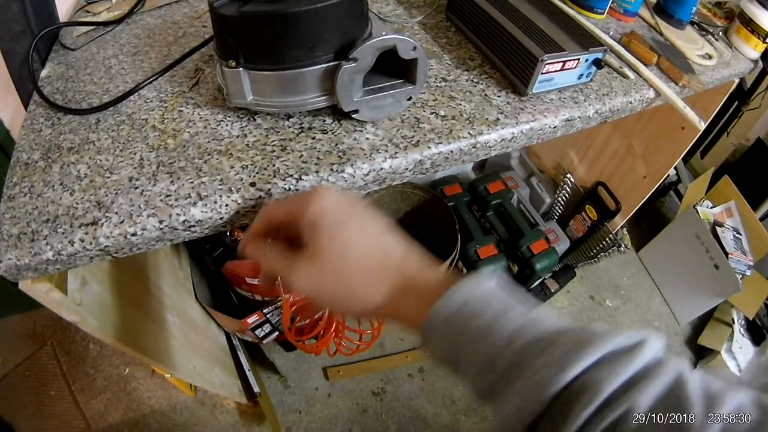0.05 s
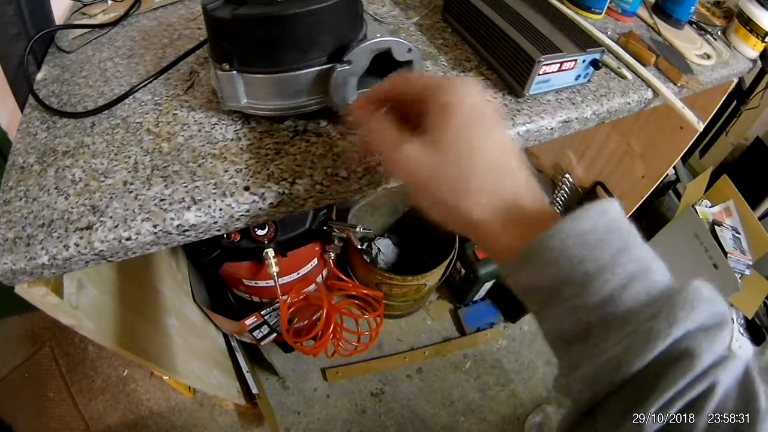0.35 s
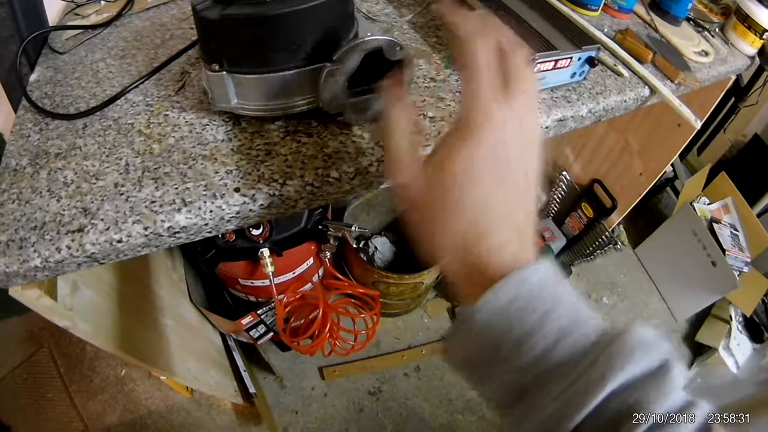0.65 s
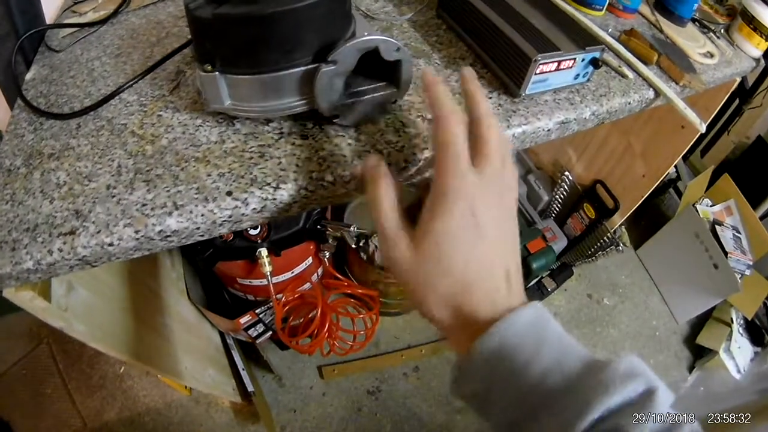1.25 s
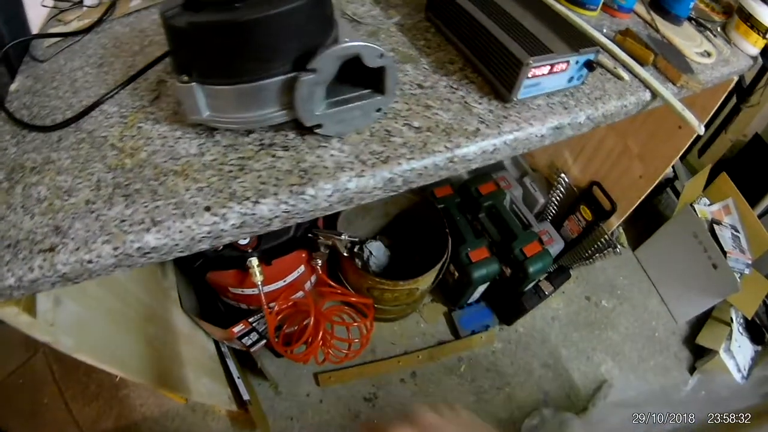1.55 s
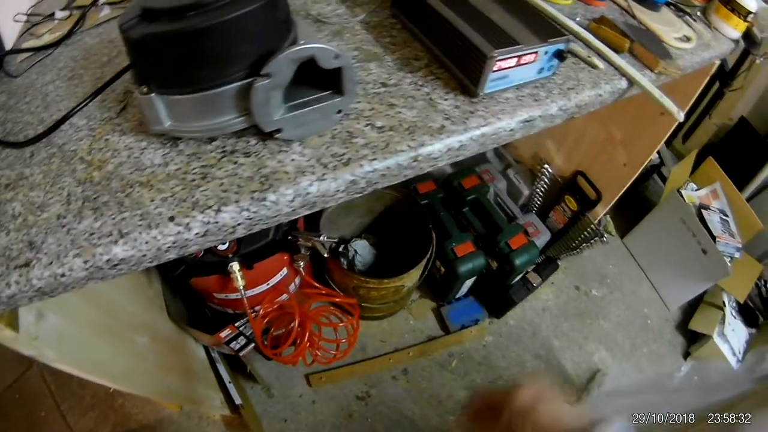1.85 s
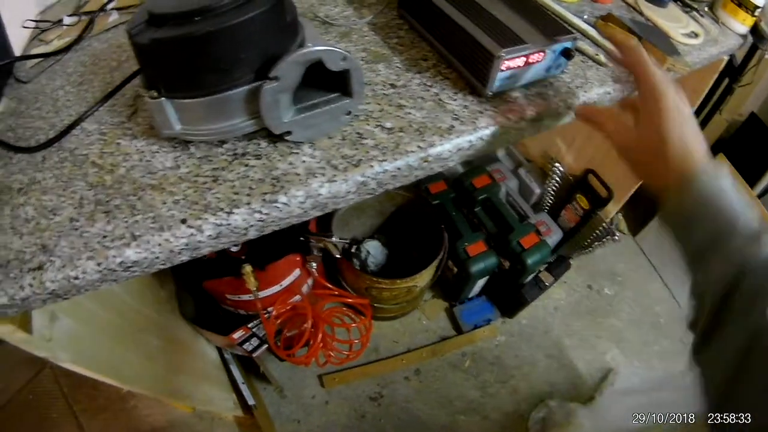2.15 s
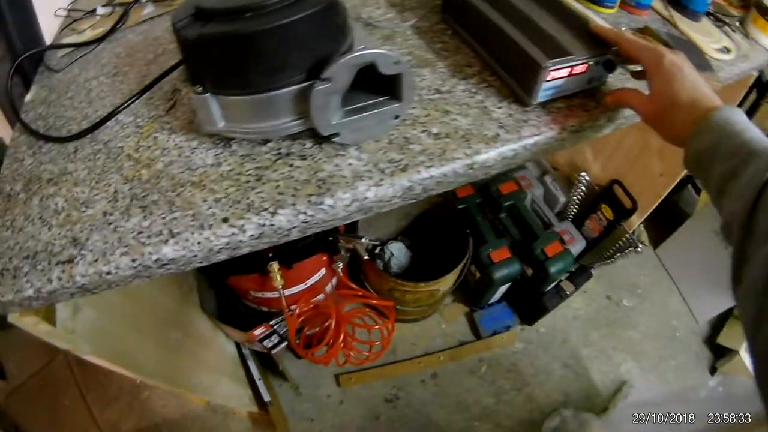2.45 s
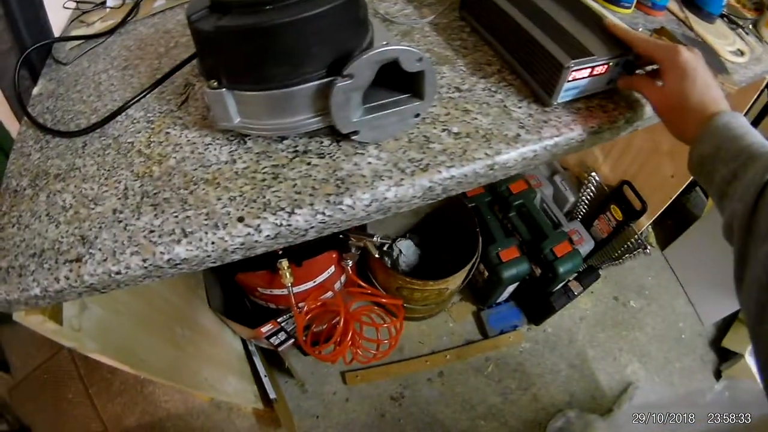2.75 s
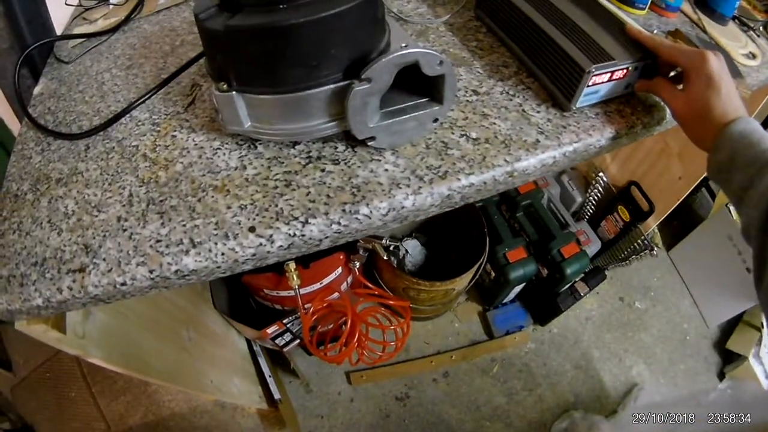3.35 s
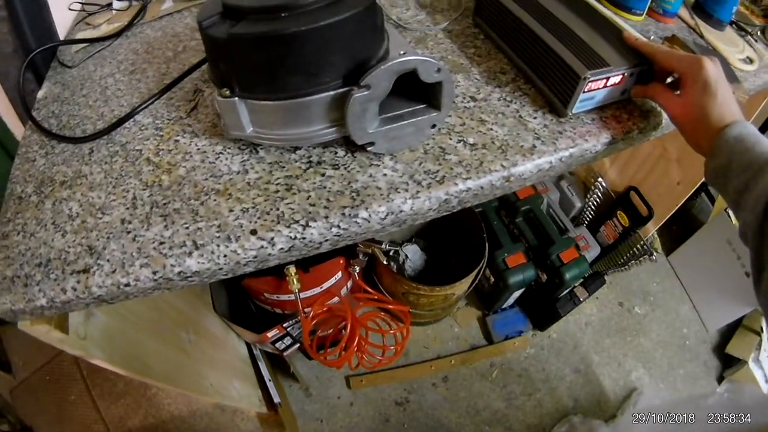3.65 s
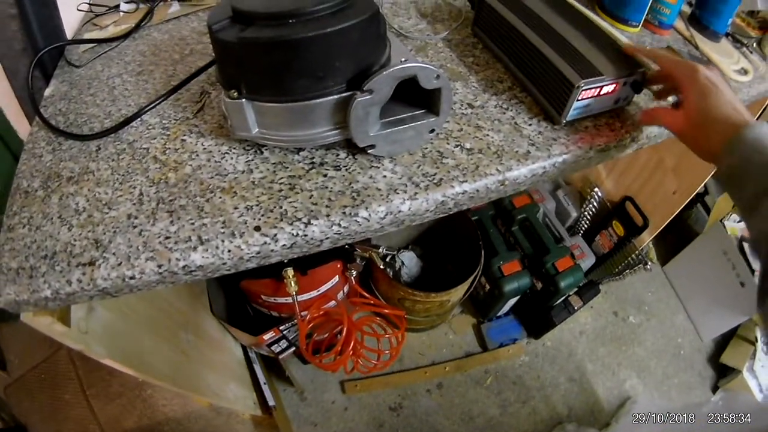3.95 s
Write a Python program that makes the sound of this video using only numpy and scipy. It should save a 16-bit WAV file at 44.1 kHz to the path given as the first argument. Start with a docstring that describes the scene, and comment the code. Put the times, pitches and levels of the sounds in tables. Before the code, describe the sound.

A small electric blower roars and hisses on a workbench with a steady whine, close to the microphone. A hand in the airstream adds a low flutter at first. Near the end the fan begins to slow.

```python
"""A small electric blower on a workbench, heard from a camera microphone within reach of its air.
From the start, air roars through the housing and hisses out of the outlet, with one steady blade tone.
For the first second and a half a hand in the stream adds a low flutter, and at about 0.8 s it turns a
puff onto the microphone. Around 2 s a thin high hiss swells and fades. Near the end the speed is turned
down and the fan begins to coast: the tone sinks and dies away, and the roar and hiss ease off."""
import sys
import numpy as np
from scipy import signal
from scipy.fft import rfft, irfft, next_fast_len
from scipy.io import wavfile
from scipy.ndimage import uniform_filter1d, map_coordinates

SR = 44100
rng = np.random.default_rng(int(sys.argv[2]) if len(sys.argv) > 2 else 0)


def wav_out(sig):
    """Save sig, one row per channel (or a flat mono array), as 16-bit PCM at SR to the path in sys.argv[1]."""
    wavfile.write(sys.argv[1], SR, np.round(np.clip(np.atleast_2d(sig).T, -1, 1) * 32767).astype(np.int16))


N = 176400

# how near the blower sounds at the microphone (time [s], level [dB])
NEARNESS = [(0, 0.17), (.8, -0.62), (1.6, 0), (2.4, 1), (2.9, 1.4), (3.3, 0.7), (3.6, 0.5), (4, .2)]


def amp(db):
    """Decibels to gain."""
    return 10 ** (np.asarray(db) / 20)


def unit(x):
    """Scale to rms 1."""
    return x / np.sqrt(np.mean(x ** 2) + 1e-20)


def along(points, hz):
    """Read (frequency, value) points at hz, on a log axis."""
    freqs, values = np.transpose(points)
    return np.interp(np.log(hz + 1), np.log(freqs + 1), values)


def curve(rows):
    """Join (time, value) points, one value per sample."""
    return np.interp(np.arange(N) / SR, *np.transpose(rows))


def wobble(per_s):
    """A smooth random curve with per_s knots a second."""
    knots = rng.standard_normal(int(N * per_s / SR) + 4)
    return map_coordinates(knots, [np.arange(N) * per_s / SR])


def filtered(x, response):
    """Filter x by a gain given as a function of frequency."""
    size = next_fast_len(N + SR // 2)
    return irfft(rfft(x, size) * response(np.fft.rfftfreq(size, 1 / SR)), size)[:N]


def rush(spectrum):
    """Noise of rms 1 with the given colour."""
    return unit(filtered(rng.standard_normal(N), lambda hz: amp(along(spectrum, hz))))


def ringing(modes):
    """Noise of rms 1 in a set of steep-sided resonances."""
    def gain(hz):
        peaks = (amp(db) / (1 + 2 * ((hz - centre) / width) ** 2) for centre, width, db in modes)
        return np.sqrt(sum(peak ** 2 for peak in peaks))
    return unit(filtered(rng.standard_normal(N), gain))


def notches(dips, hz):
    """Gain of a set of narrow dips."""
    return amp(-sum(db * np.exp(-(2 * (hz - centre) / width) ** 2) for centre, width, db in dips))


def patchy(x, depth_db):
    """Shift the colour of x slowly, band by band."""
    bands = signal.stft(x, nperseg=512)[2]
    drift = uniform_filter1d(rng.standard_normal(bands.shape), size=3, axis=0)  # across frequency
    drift = uniform_filter1d(drift, size=130, axis=1)  # across time
    return signal.istft(bands * amp(depth_db * unit(drift)), nperseg=512)[1][:N]


def blower_gain(speed, db_per_decade, nearness):
    """Gain at the microphone: a power law of fan speed, and a multiple of the nearness level."""
    return amp(nearness * curve(NEARNESS) + db_per_decade * np.log10(speed))


def roar():
    """Turbulence in the fan, part of it ringing in the housing; its hum and howl each swell a little."""
    # resonances of the housing (frequency [Hz], width [Hz], level [dB])
    housing = [(370, 77, -18), (476, 40, -0.5), (515, 34, -9), (553.6, 14, -11), (607, 30, -16.5),
               (653, 70, -17.5), (736.4, 30, -14.5), (873, 41, -14.5), (1174.7, 70.5, -3), (1255, 108, -6),
               (1437, 150, -15.5), (1710, 82, -19), (1890, 92, -21.5), (1927, 34, -15)]
    # broad turbulence inside the fan (frequency [Hz], spectral level [dB])
    turbulence = [(8, -26.5), (25, -5), (65, -1), (125, -8), (230, -4), (340, 0.5), (650, -1.5), (950, -4),
                  (1550, -3), (1950, -3), (2150, -8), (2400, -19.5), (3000, -31.5), (6000, -65.5)]
    # narrow cancellations in the roar (frequency [Hz], width [Hz], depth [dB])
    hollows = [(425.4, 20, 13.5), (582, 9.9, 12), (777, 45, 3), (880, 55, 2.5)]
    # low hum of the housing against the rest of the roar (time [s], level [dB])
    hum_swell = [(0, 0), (.7, 1.4), (1.6, 1), (1.9, -1.5), (2.6, -1.5), (3.05, 0.5), (3.5, 0.5), (4, -0.5)]
    # howl round the blade tone against the rest of the roar (time [s], level [dB])
    howl_swell = [(0, 0.6), (.4, -0.5), (.8, -1.5), (1.4, 0), (1.9, -.8), (2.5, -1), (2.9, 1.1), (3.3, .8),
                  (3.65, 0.5), (4, 2)]
    hum_below_hz, howl_hz, howl_half_width_hz = 590, 1220, 200
    air = amp(-23.5) * ringing(housing) + amp(-32.5) * rush(turbulence)
    air = filtered(air, lambda hz: notches(hollows, hz))
    hum = filtered(air, lambda hz: 1 / (1 + (hz / hum_below_hz) ** 10))
    howl = filtered(air, lambda hz: 1 / (1 + ((hz - howl_hz) / howl_half_width_hz) ** 10))
    return air + hum * (amp(curve(hum_swell)) - 1) + howl * (amp(curve(howl_swell)) - 1)


def jet():
    """The air jet hisses out of the outlet, coloured by its resonances."""
    # hiss of the jet (frequency [Hz], spectral level [dB])
    jet_colour = [(800, -21.5), (2300, -2), (2850, -2.5), (3300, -1), (3700, 1.5), (4250, -1.2), (4600, -2),
                  (4850, -7.5), (5400, -12), (6000, -16.5), (6600, -15.5), (7000, -24), (7400, -20),
                  (8500, -28.5), (9200, -37), (10600, -38.5), (11500, -33), (12800, -47.5), (15000, -45)]
    # resonances of the outlet (frequency [Hz], width [Hz], level [dB])
    outlet = [(2578, 80, 4), (2980, 70, -2), (3130, 100, -4.5), (3515, 150, 2), (4210, 150, -1),
              (4360, 130, -9.5), (4640, 130, -5), (5120, 150, -13.5), (5750, 180, -18), (6530, 280, -19.5)]
    return patchy(amp(-46.5) * rush(jet_colour) + amp(-49) * ringing(outlet), depth_db=1.4)


def blade_tone(speed):
    """The passing blades give one clean, slightly unsteady tone whose pitch follows the fan speed."""
    blade_hz, drift, flutter_db = 1314.1, .00015, .9
    pitch_hz = blade_hz * speed * (1 + drift * wobble(per_s=6.33))
    phase = 2 * np.pi * np.cumsum(pitch_hz) / SR
    level_db = -29.5 + flutter_db * wobble(per_s=18)
    return np.sqrt(2) * np.sin(phase) * amp(level_db)


def hand():
    """The stream flutters round a hand held in it and whistles faintly at the fingers."""
    # strength of the flutter (time [s], level [dB])
    flutter_level = [(0, -36.5), (.15, -38), (.29, -35), (.36, -45.5), (.45, -36), (.8, -33.5),
                     (1.2, -34.5), (1.37, -43), (1.5, -60), (4, -88.5)]
    # air breaking round the hand (frequency [Hz], spectral level [dB])
    flutter_colour = [(10, -32.5), (35, -12), (75, 1.5), (130, -1), (230, 4.5), (400, -7.5), (600, -12),
                      (900, -1), (1500, -23.5), (5000, -61), (16000, -77.5)]
    # airy whistle at the fingers (frequency [Hz], width [Hz], level [dB])
    finger_whistle = [(3760, 150, 0), (2300, 77, 0.0029)]
    flutter = rush(flutter_colour) + amp(-18.5) * ringing(finger_whistle)
    return flutter * amp(curve(flutter_level))


def puff(at_s, spread_s):
    """The hand turns one puff of air onto the microphone: a brief low rumble."""
    # wind on the microphone (frequency [Hz], spectral level [dB])
    puff_colour = [(8, -15), (25, -11), (70, -1), (130, -13), (600, -60), (5000, -110)]
    swell = np.exp(-.5 * ((np.arange(N) / SR - at_s) / spread_s) ** 2)
    return amp(-36.5) * swell * rush(puff_colour)


def high_hiss():
    """A thin band of high hiss from the outlet swells mid-way and fades."""
    # swell of the high hiss (time [s], level [dB])
    hiss_level = [(0, -78.5), (1.2, -75), (1.6, -69), (1.9, -64.5), (2.3, -70), (2.7, -83), (4, -98)]
    # its peaks (frequency [Hz], width [Hz], level [dB])
    hiss_peaks = [(7030, 650, 2), (8250, 400, -9)]
    return amp(curve(hiss_level)) * ringing(hiss_peaks)


def fan_speed(coast_at_s, decay_per_s):
    """Share of full speed: steady, then falling exponentially as the fan coasts."""
    return np.exp(-decay_per_s * np.maximum(np.arange(N) / SR - coast_at_s, 0))


def scene():
    """The blower on the bench and the hand in front of it, in mono at the microphone."""
    speed = fan_speed(coast_at_s=3.573, decay_per_s=.2)
    body = roar() * blower_gain(speed, db_per_decade=113, nearness=1)
    hiss = (jet() + high_hiss()) * blower_gain(speed, db_per_decade=136, nearness=.7)
    buffeting = hand() + puff(at_s=.765, spread_s=.03)
    tone = blade_tone(speed) * blower_gain(speed, db_per_decade=519, nearness=2.4)
    return (body + hiss + buffeting + tone)[None]


def record(dry):
    """A small camera microphone: a notch in the treble, faint self-noise and a band limit."""
    # treble notch of the microphone (frequency [Hz], width [Hz], depth [dB])
    mic_notch = [(7920, 480, 22)]
    self_noise_db, top_hz = -77, 15720
    heard = filtered(dry[0], lambda hz: notches(mic_notch, hz))
    heard += amp(self_noise_db) * rng.standard_normal(N)
    return filtered(heard, lambda hz: hz < top_hz)[None]


dry = scene()
out = record(dry)
wav_out(out)
```